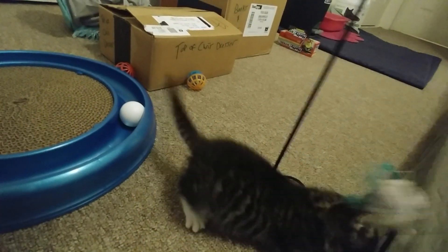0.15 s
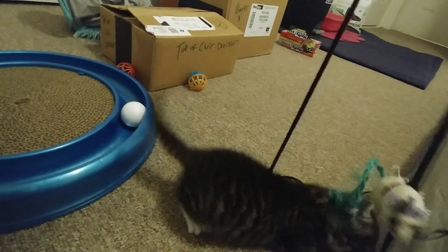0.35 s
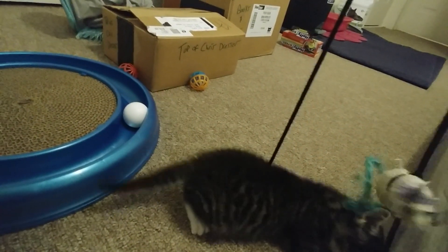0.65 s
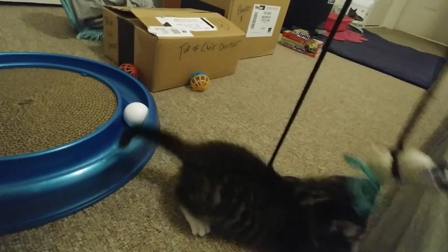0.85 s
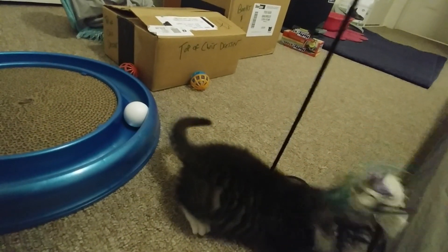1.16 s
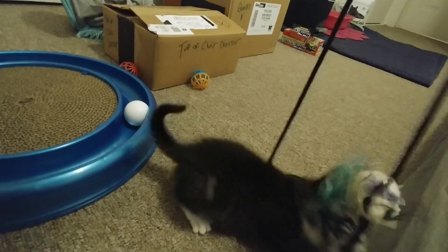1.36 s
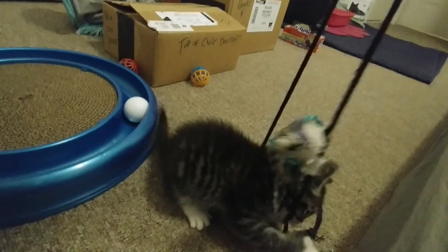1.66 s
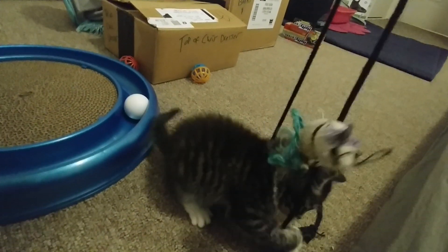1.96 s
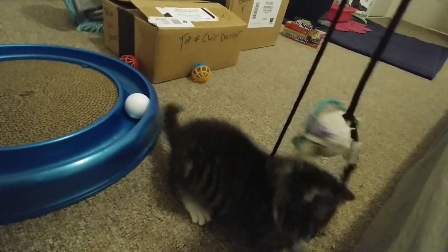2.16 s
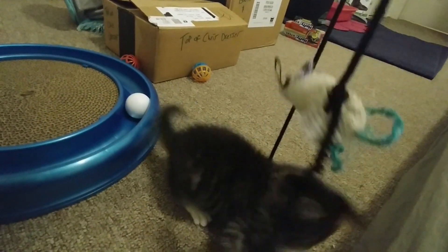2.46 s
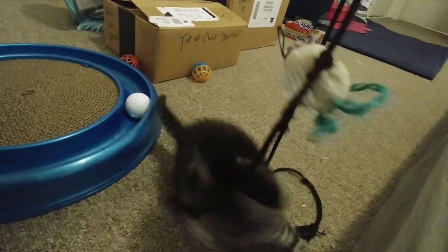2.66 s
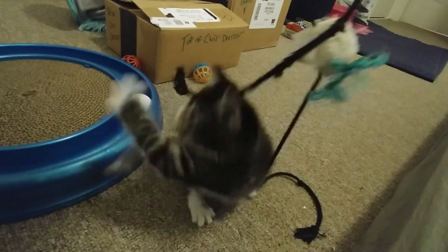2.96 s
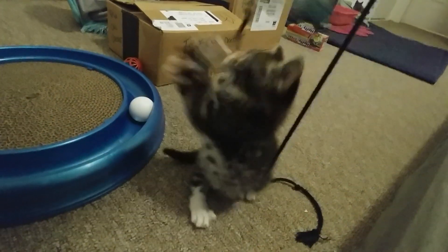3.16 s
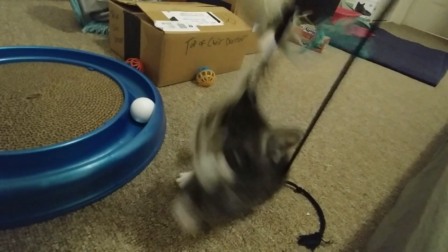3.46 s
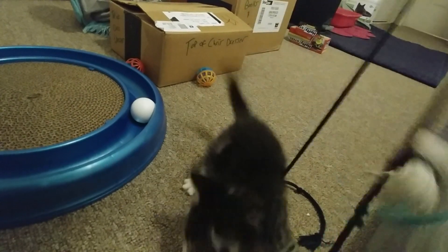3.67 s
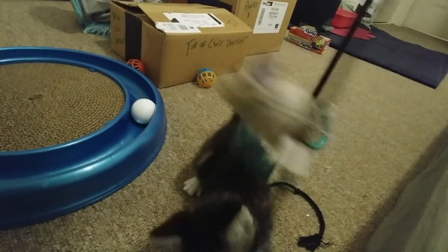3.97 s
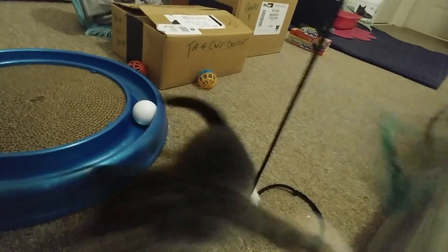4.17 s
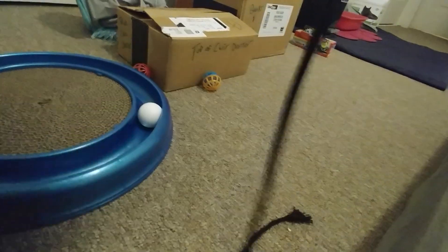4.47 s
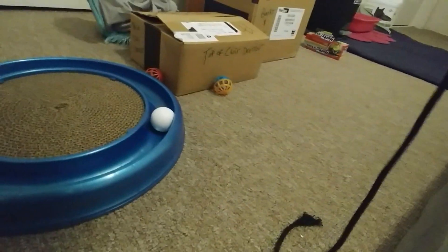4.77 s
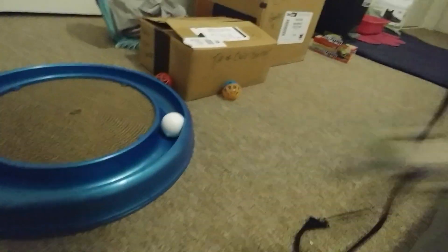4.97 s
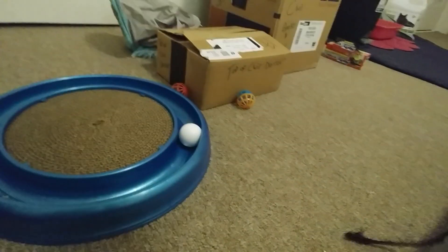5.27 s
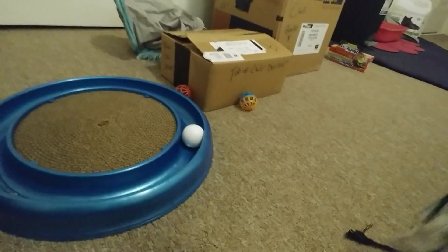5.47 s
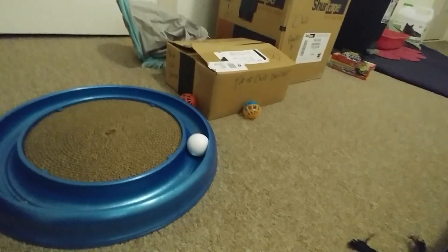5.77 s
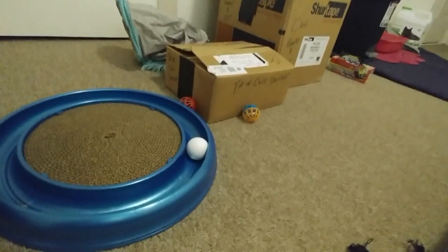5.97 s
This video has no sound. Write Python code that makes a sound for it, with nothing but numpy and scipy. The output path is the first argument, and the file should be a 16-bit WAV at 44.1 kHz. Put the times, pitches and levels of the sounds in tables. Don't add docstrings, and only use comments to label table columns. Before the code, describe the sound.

Quiet indoor hum and soft hiss continue throughout, with tiny, faint, distant chirps mostly in the first 1.3 seconds. Close by, at 0.1 s a soft paw thump starts a crackling drag of fur over carpet, fading by 0.4 s with a dull brush. A scrape at 0.8 s and a sharp tick with a low thump at 0.92 s follow; then light brushes and clicks around 1.4-1.5 s. After a lull, a swishing swipe and low thuds land at 2.15-2.25 s. Two bumps at 2.6-2.7 s end in a hard cord snap. Soft low pats and faint rubs pass from 3.1 to 3.9 s; a lone snap comes at 4.19 s. The strongest pounce hits at 4.5 s, dense cracks over woody floor thumps, with another knock at 4.6 s. A tick at 5.34 s precedes a bright cloth slap at 5.46 s and small scuffs until 5.7 s, leaving hiss.

```python
import sys
import numpy as np
from scipy import signal
from scipy.io import wavfile
from scipy.ndimage import uniform_filter1d

SR = 44100
rng = np.random.default_rng(int(sys.argv[2]) if len(sys.argv) > 2 else 0)


def level_to_linear(level):
    exponent = np.asarray(level, float) / 20
    return 10 ** exponent


def wav_record(signal):
    frames = np.transpose(np.atleast_2d(signal))
    bounded = np.clip(frames, -1, 1)
    quanta = np.round(bounded * 32767).astype(np.int16)
    wavfile.write(sys.argv[1], SR, quanta)


N = 269539

# (frequency [Hz], density [dB per Hz])
HISS_SPECTRUM = [(20, -42), (37, -16), (50, -7), (85, -1), (116, -8), (237, -12), (313, -13.5),
                 (607, -17.5), (1350, -22), (3100, -26), (6190, -29.5), (10800, -37.5), (13000, -32),
                 (15900, -31)]
# (frequency [Hz], left-right correlation [-1..1])
HISS_LIKENESS = [(60, 0.76), (240, 0.37), (950, -0.037), (3770, -0.026), (15000, -0.028)]
# (frequency [Hz], left over right [dB])
HISS_BALANCE = [(60, 5.5), (180, 2), (550, 0.5), (1650, 3), (4970, 0), (15000, 0.5)]
HISS_DB = -68
# (time [s], length [s], first pitch [Hz], last pitch [Hz], level [dB])
CHIRPS = [(0, 0.0073, 6770, 7470, -55), (0.012, 0.04, 3230, 3120, -68), (0.535, 0.054, 8400, 7920, -67),
          (0.525, 0.059, 5700, 5170, -79), (0.735, 0.05, 3470, 3330, -74), (0.565, 0.11, 5080, 4950, -79),
          (0.915, 0.035, 3100, 2980, -62), (0.93, 0.13, 5140, 4900, -76), (1.005, 0.075, 3470, 3060, -64),
          (1.097, .06, 6200, 5500, -81), (1.225, 0.03, 6310, 5640, -72.5), (1.229, 0.03, 2700, 2400, -79),
          (1.3, 0.055, 4000, 2860, -68), (1.313, 0.038, 3850, 3600, -73), (1.305, 0.085, 7170, 7140, -82),
          (1.836, .095, 5310, 5320, -81.5), (3.26, .036, 7220, 7260, -84), (3.28, 0.03, 6100, 6000, -87),
          (3.698, 0.092, 7200, 7200, -86), (3.776, 0.06, 6160, 6030, -83), (5.165, .12, 5700, 5360, -88),
          (.06, .04, 3100, 3030, -66), (.108, .04, 3080, 3020, -68), (0, .035, 7160, 7120, -67),
          (.785, .03, 3350, 3250, -67)]
BLUR_HZ, BLUR_HZ_PER_GLIDE_HZ = 70, 0.6
CHIRP_NOISE_SHARE = 0.55

# (time [s], dull peak [dB], bright over dull [dB], rise [s], fade t60 [s])
FUR_BRUSHES = [(.039, -62, 7, 0.023, 0.19), (0.389, -38.5, -6.5, 0.0097, 0.081),
               (0.47, -49, -10.5, 0.0028, 0.25), (0.92, -47, 3, 0.0072, 0.27),
               (1.396, -54.5, 5, 0.0078, 0.26), (1.502, -53.5, -2.5, 0.009, 0.27),
               (2.484, -48.5, 2, 0.0092, .12), (2.611, -48, -8.5, .004, 0.2),
               (3.15, -70, 14.5, 0.0074, 0.2), (3.493, -54.5, -7, 0.0045, 0.47),
               (3.588, -60, 0.5, 0.0066, 0.5), (3.666, -57, 0.5, 0.0045, 0.4),
               (3.879, -55.5, 0.5, 0.0035, 0.3), (4.311, -52, -2, 0.006, 0.22),
               (4.379, -49.5, -2.5, 0.0059, 0.21), (4.421, -66, 3, .012, 1),
               (5.334, -44, -10, 0.0064, 0.29), (5.672, -47.5, -5.5, 0.0093, 0.29)]
FINE_SLOPE, FINE_DB = 1.43, 1.5
# (peak time [s], level [dB], rise t60 [s], fade t60 [s])
FUR_SCRAPES = [(.13, -50.5, 0.025, 1), (.2, -47.5, 0.23, 0.43), (.345, -54.5, 0.53, 0.07),
               (.802, -50, 0.13, 0.16), (2.16, -54.5, 0.012, 0.24), (2.209, -42.5, 0.087, 0.043),
               (2.225, -72, .05, 0.11), (2.622, -69, 0.0089, 0.067), (2.69, -57, 0.015, 0.18),
               (2.76, -73, .1, 0.46), (4.14, -62, 0.084, 0.093), (4.2, -59.5, 0.12, 0.22),
               (4.505, -38, 0.04, 0.066), (4.62, -57, 0.15, 0.25), (4.7, -69.5, 0.26, 0.38),
               (5.52, -68, 0.071, 0.13), (5.59, -61.5, 0.11, 0.27)]
# (peak time [s], level [dB], rise t60 [s], fade t60 [s], brightest [Hz])
CLOTH_RUSTLES = [(0.127, -50, 0.018, 0.63, 3170), (.265, -54, 0.62, 0.34, 3000),
                 (.345, -58, 0.65, 0.11, 3230), (0.8, -56.5, 0.11, 0.31, 3020),
                 (2.192, -52.5, 0.038, 0.22, 3650), (2.205, -35.5, 0.064, 0.017, 4800),
                 (2.705, -89, 0.036, 0.11, 3940), (4.2, -58, 0.15, 0.21, 3330),
                 (4.512, -45, 0.052, 0.064, 4730), (4.529, -56, .1, 0.11, 4080),
                 (4.598, -46.5, 0.011, 0.12, 2400), (4.62, -53.5, 0.14, 0.14, 2750),
                 (4.73, -65.5, 0.33, 0.47, 6300), (5.46, -38.5, 0.0062, 0.16, 3180),
                 (5.48, -37.5, 0.053, 0.071, 2270), (5.572, -63, 0.073, 0.2, 2090),
                 (5.62, -66, 0.33, 0.091, 6000), (5.72, -79, .4, 0.29, 1800)]
RUSTLE_FINE_DB = -11
# (peak time [s], fine level [dB], rise t60 [s], fade t60 [s], fizz over fine [dB])
CLOTH_SLAPS = [
    (2.21, -65, 0.34, 0.057, -30),
    (2.702, -82, 0.2, 0.17, 11),
    (4.328, -81, .12, 0.35, 9),
    (4.51, -54, 0.027, 0.069, -12),
    (5.46, -42, 0.0059, 0.15, -10),
    (5.484, -45.5, 0.05, 0.057, 1),
]
HOLD_S = 0.002
# (frequency [Hz], gain [dB])
PILE_COLOUR = [(150, -2), (250, 3.5), (631, -5.5), (714, -1), (1410, -4.5), (1590, -2), (1770, -5.5),
               (2470, -15), (4710, -12.5), (5140, -11), (5610, -15), (8690, -28), (10700, -35),
               (13000, 5.5), (16300, 10)]

# (time [s], peak [dB], board pitch [Hz], ring t60 [s])
PAW_LANDINGS = [(.119, -44, 150, 0.033), (0.126, -47, 100, 0.3), (0.922, -47.5, 177, 0.042),
                (0.931, -42, 83, 0.062), (2.162, -47.5, 355, .07), (2.161, -40, 115, 0.3),
                (2.195, -34, 155, 0.076), (2.218, -31, 80, 0.14), (2.6181, -40, 325, 0.1),
                (2.62, -42.5, 600, 0.016), (2.621, -33, 143, 0.054), (2.7051, -40, 300, 0.08),
                (2.7065, -46, 550, 0.017), (2.7015, -34.5, 144, 0.13), (3.41, -40.5, 85, 0.17),
                (3.462, -44, 88, 0.031), (3.625, -48, 76.9, 0.45), (3.67, -42, 81, 0.17),
                (4.186, -53, 157, 0.16), (4.381, -51, 196, 0.13), (4.419, -42.5, 256, 0.073),
                (4.421, -53, 780, 0.022), (4.496, -37, 380, 0.09), (4.511, -32.5, 350, 0.034),
                (4.52, -28.5, 190, 0.06), (4.526, -30, 98.2, 0.083), (4.5991, -33, 100.3, 0.18),
                (4.597, -41.5, 298, 0.032), (4.72, -52.5, 138.4, 0.32), (5.484, -46, 150, 0.14),
                (5.492, -45.5, 97, 0.11), (5.591, -46.5, 210, 0.051), (5.597, -47, 94, 0.11),
                (5.668, -47, 150, 0.11), (5.712, -47, 89.5, 0.072), (.042, -54, 130, .15),
                (.143, -44, 150, .1), (.163, -45, 140, .1), (4.383, -50, 310, .08), (4.4, -53, 380, .06),
                (4.437, -47, 170, .1), (4.53, -36, 180, .12), (4.595, -45, 590, .04),
                (4.6075, -43, 200, .07), (4.625, -43, 215, .1), (4.665, -49, 165, .12),
                (4.71, -53, 225, .08), (4.5972, -34, 140, .03), (2.492, -52, 115, .08),
                (5.341, -52, 320, .06)]
PAW_RISE_S = 0.0013
# (time [s], dull peak [dB], bright peak [dB])
CLAW_CATCHES = [(.118, -47, -72), (.767, -34, -64), (0.798, -35, -51), (.939, -39, -69), (3.517, -44, -66),
                (4.385, -35.5, -56), (4.509, -17, -53), (4.52, -32, -65), (4.596, -24, -39),
                (4.627, -37, -52), (5.336, -31.5, -53), (5.565, -45, -76), (5.585, -32.5, -49)]
CLAW_HZ, CLAW_MS, CLAW_RING = 2430, 0.93, 1.9
# (time [s], dull peak [dB], bright peak [dB], bright ring [Hz])
CORD_TICKS = [(0.403, -37, -50.5, 4300), (0.923, -22.5, -47, 7500), (1.224, -72.5, -64, 4770),
              (1.398, -47, -58, 5450), (1.524, -67, -62, 4500), (3.879, -42.5, -59, 4550),
              (2.161, -52, -60, 4030), (2.484, -62, -54, 4560), (2.687, -39, -58, 4000),
              (2.79, -56, -74, 5200), (3.149, -50, -62, 5800), (3.164, -53, -61, 5730),
              (3.286, -47, -70, 6040), (4.466, -43, -68, 4000), (4.502, -27, -41, 4000),
              (4.5, -27, -47, 5940), (4.5086, -11, -32.5, 5500), (4.51, -15.5, -25, 5730),
              (4.512, -29, -36, 4230), (4.514, -35, -35, 4200), (5.68, -44, -69.5, 5000)]
CORD_MS, CORD_RING = 0.54, 2.05
# (time [s], dull peak [dB], bright peak [dB], bright ring [Hz])
CORD_SNAPS = [
    (2.1495, -40, -47, 4000),
    (2.26, -48, -52, 4350),
    (2.6895, -34, -45, 4300),
    (2.7001, -20, -29, 4300),
    (2.7077, -43, -41, 4800),
    (4.1902, -29, -38, 5300),
    (4.4773, -42, -52, 4500),
    (4.4796, -28, -43, 5000),
    (4.4965, -19, -44, 5600),
]
# (time [s], dull peak [dB], bright peak [dB], bright ring [Hz])
FIBRE_SNAPS = [
    (.133, -30, -46, 3200),
    (.1445, -31, -50, 3600),
    (.1655, -30, -48, 3300),
    (.188, -29, -48, 3500),
    (.198, -29, -47, 3200),
    (.2105, -32, -50, 3400),
    (.2615, -36, -47, 3300),
    (.314, -38, -54, 4000),
    (.328, -40, -54, 3800),
    (.357, -42, -54, 4300),
]
SNAP_MS, SNAP_RING = .06, .5
# (peak time [s], rumble [dB], rise t60 [s], fade t60 [s])
WEIGHT_SHIFTS = [(.128, -47.5, 0.091, 1.13), (.766, -55, 0.091, 0.69), (2.135, -58, 0.017, 0.66),
                 (2.25, -45.5, 0.0056, 0.14), (2.47, -62.5, 0.011, 0.53), (2.655, -49, 0.024, 0.03),
                 (2.688, -46, 0.031, 0.027), (2.75, -57, .012, 0.34), (2.95, -73, 1.1, 0.073),
                 (3.5, -69, 0.027, 0.92), (3.72, -60, 0.0085, .06), (3.74, -65.5, .05, 2.5),
                 (4.48, -54, 1.1, 0.026), (4.64, -44, 0.0074, 0.1), (4.67, -56.5, 0.051, 0.73),
                 (5.345, -58, 0.03, 0.32), (5.62, -58, 0.017, 1.)]
# (frequency [Hz], width [Hz], gain [dB])
FLOOR_MODES = [(87.5, 54, 8.5), (150, 53, 3.5), (230, 118, -9), (320, 22, -27)]
# (time [s], length [s], first centre [Hz], last centre [Hz], level [dB])
STROKES = [(0.13, 0.03, 2250, 1900, -43.5), (0.148, .09, 1490, 1000, -51.5), (0.189, .045, 925, 816, -54),
           (.26, 0.0088, 3300, 3300, -50.5), (0.299, 0.049, 3800, 3620, -67),
           (.392, 0.023, 1480, 1400, -59.5), (0.788, 0.029, 1425, 1320, -51), (2.18, 0.028, 780, 760, -53),
           (4.495, 0.024, 870, 800, -46), (4.516, 0.0156, 756, 900, -48), (2.191, 0.029, 7960, 8200, -66),
           (4.509, .007, 1560, 1540, -38), (4.511, 0.0049, 8800, 8850, -48.5),
           (4.175, .06, 8000, 7900, -71), (5.58, 0.043, 6200, 5600, -66), (2.182, 0.018, 2860, 3760, -44.5),
           (2.189, 0.025, 3570, 5100, -39.5), (2.198, .018, 3500, 2700, -41.5),
           (2.157, 0.0093, 1310, 1600, -68), (4.196, 0.011, 1300, 1300, -57.5),
           (4.594, 0.009, 2350, 2400, -41), (4.594, 0.0062, 4800, 4830, -48),
           (4.611, 0.012, 2670, 2780, -51), (5.458, 0.0233, 3240, 3380, -48),
           (5.459, 0.045, 1920, 2140, -48.5), (5.465, 0.034, 6800, 6400, -42),
           (5.567, 0.011, 2100, 2000, -65), (5.577, 0.031, 1780, 1670, -62.5),
           (5.693, 0.066, 1750, 1680, -74.5), (.152, .035, 2000, 1700, -48), (.136, .04, 1050, 950, -50),
           (.186, .04, 1600, 1450, -51), (2.161, .006, 4000, 3800, -58), (4.497, .012, 1500, 1400, -41),
           (4.514, .02, 1500, 1300, -48), (2.793, .02, 4300, 4000, -83), (2.708, .014, 3800, 3700, -64)]
STROKE_WIDTH = 0.27
# (time [s], peak [dB], ring [Hz], decay [ms])
PINGS = [(.4035, -50, 4800, 1.), (.9248, -41, 7330, 0.4), (.9425, -47, 7200, 0.91),
         (1.525, -41, 7560, 0.85), (3.029, -55.5, 4550, .7), (3.045, -64.5, 4780, .7),
         (3.666, -48, 1460, 0.77), (3.879, -40, 4400, 0.42), (4.321, -59, 4460, 0.55),
         (4.326, -57, 4010, 0.39), (4.3858, -45, 1860, 1.1), (4.386, -54.5, 4070, .7),
         (5.337, -64, 2620, 0.62), (5.582, -48, 1900, 1.), (5.587, -58, 5500, .6)]

# (time [s], left over right [dB], left port lead [ms])
PLACE = [(0, 7.5, -0.26), (.8, 9, -0.37), (.92, 3, -0.27), (1.2, 3, -.02), (1.5, 7.5, -0.13),
         (2.2, 9, -0.13), (2.7, 7, -0.22), (3.9, 8, -0.18), (4.25, 5.5, -0.15), (4.36, 11.5, 0.17),
         (4.6, 3.5, 0.418), (5.42, 5, 0.36), (5.449, -2, -0.61), (5.539, 5, -0.46), (5.558, 5, 0.52)]
# (frequency [Hz], share of the level lean [ratio])
BODY_SHADOW = [(100, 0.59), (400, 0.41), (700, 0.75), (1300, 1.64), (2400, 0.74), (4400, 2.19),
               (8000, 0.067), (15000, 0.49)]
# (frequency [Hz], t60 [s])
ROOM_T60 = [(100, 0.18), (500, 0.16), (2000, 0.14), (6000, 0.14), (14000, 0.12)]
EDGE_HZ = 15800


def evened(x):
    return x / np.sqrt(np.mean(x ** 2) + 1e-20)


def read(points, hz):
    f, value = np.transpose(points)
    return np.interp(np.log(hz + 1), np.log(f + 1), value)


def add(mix, s, sound):
    part = mix[..., round(s * SR):][..., :sound.shape[-1]]
    part += sound[..., :part.shape[-1]]


def resonate(x, hz, width_hz):
    turn = np.exp(2j * np.pi * np.cumsum(hz * np.ones(len(x))) / SR)
    r = np.exp(-np.pi * width_hz / SR)
    smooth = signal.lfilter([1 - r], [1, -r], x / turn + 1e-18)
    return 2 * (turn * smooth).real


def resonate_twice(x, hz, width_hz):
    return resonate(resonate(x, hz, width_hz), hz, width_hz)


def swells(rows):
    s, db, rise_s, fade_s = np.transpose(rows)[:, :, None]
    t = np.arange(0, N + 32, 32) / SR
    before = (s - t) / abs(rise_s)
    after = np.maximum(t - s - HOLD_S, 0) / abs(fade_s)
    fall_db = np.minimum(60 * np.maximum(before, after), 200)
    gain = np.sqrt((level_to_linear(db - fall_db) ** 2).sum(0))
    return np.interp(np.arange(N) / SR, t, gain)


def pile_taps(low_hz, high_hz):
    hz = abs(np.fft.fftfreq(2048, 1 / SR)) + 1
    edges = np.sqrt((1 + (low_hz / hz) ** 6) * (1 + (hz / high_hz) ** 24))
    log_gain = np.log(level_to_linear(read(PILE_COLOUR, hz)) / edges + 1e-5)
    minimum_phase = np.exp(log_gain - 1j * signal.hilbert(log_gain).imag)
    taps = np.fft.ifft(minimum_phase).real[:1024]
    return taps / np.linalg.norm(taps)


def hiss():
    frames, hz = N // 512 + 5, np.fft.rfftfreq(2048, 1 / SR)
    a, b, c, d, patches = rng.standard_normal((frames, 1025, 5)).T
    patches = uniform_filter1d(patches, size=30, axis=0)
    patches = evened(uniform_filter1d(patches, size=8, axis=1))
    same = np.clip(read(HISS_LIKENESS, hz), -1, 1)[:, None]
    left = a + 1j * b
    right = same * left + np.sqrt(1 - same ** 2) * (c + 1j * d)
    half_db = read(HISS_BALANCE, hz)[:, None] / 2
    patch_db = 1.94 * patches * (hz[:, None] < 7000)
    level_db = read(HISS_SPECTRUM, hz)[:, None] + patch_db + np.array([half_db, -half_db])
    z = np.array([left, right]) * level_to_linear(level_db)
    noise = signal.istft(z, nperseg=2048, noverlap=1536)[1][:, :N]
    return level_to_linear(HISS_DB + 2.5) * evened(noise)


def chirps():
    out = np.zeros(N)
    breaths = rng.standard_normal((len(CHIRPS), 9000))
    for (s, length_s, first_hz, last_hz, db), air in zip(CHIRPS, breaths):
        count = round(length_s * SR)
        glide_hz = np.linspace(first_hz, last_hz, count)
        width_hz = BLUR_HZ + BLUR_HZ_PER_GLIDE_HZ * abs(first_hz - last_hz)
        blur = evened(resonate_twice(air[:count], glide_hz, width_hz))
        tone = np.sin(2 * np.pi * np.cumsum(glide_hz) / SR)
        whistle = CHIRP_NOISE_SHARE * blur + (1 - CHIRP_NOISE_SHARE) * tone
        add(out, s, level_to_linear(db) * evened(whistle) * signal.windows.tukey(count, .4))
    return out


def brushes():
    out, t = np.zeros((3, N)), np.arange(SR // 4) / SR
    for s, dull_db, over_db, rise_s, t60_s in FUR_BRUSHES:
        bright_db = dull_db + over_db
        fine_db = dull_db + FINE_SLOPE * over_db + FINE_DB
        shape = (1 - np.exp(-t / max(rise_s, .001))) * level_to_linear(-60 * t / t60_s)
        gains = level_to_linear(np.array([dull_db - 17.5, bright_db - 16.0, fine_db - 20.5]))
        add(out, s, np.outer(gains, shape / shape.max()))
    return out


def scuffles(bands):
    scrape = swells(FUR_SCRAPES)
    rustle = swells([row[:-1] for row in CLOTH_RUSTLES])
    brightest_hz = np.interp(np.arange(N) / SR, *np.transpose(CLOTH_RUSTLES)[[0, -1]])
    slap = swells([row[:-1] for row in CLOTH_SLAPS])
    crinkle = swells([(s, db + over_db, rise, fade) for s, db, rise, fade, over_db in CLOTH_SLAPS])
    brush_dull, brush_bright, brush_fine = brushes()
    noise = rng.standard_normal((2, N))
    snaps_db = 2.8 * evened(uniform_filter1d(rng.standard_normal((4, N)), size=60))
    out = []
    for stream in (noise[0], 0.53 * noise[0] + 0.9 * noise[1]):
        dull, bright, fine, fizz = (evened(signal.oaconvolve(stream * level_to_linear(db), taps)[:N])
                                    for db, taps in zip(snaps_db, bands))
        ringing = evened(bright + 2.14 * resonate(bright + 0.95 * dull, brightest_hz, 920))
        fur = (scrape + brush_dull) * dull + brush_bright * bright + brush_fine * fine
        cloth = rustle * ringing + crinkle * fizz + (level_to_linear(RUSTLE_FINE_DB) * rustle + slap) * fine
        out.append(fur + cloth)
    return np.array(out)


def paws():
    out, t = np.zeros(N), np.arange(SR // 3) / SR
    for s, db, hz, t60_s in PAW_LANDINGS:
        damping_db = -25 * t / t60_s - 190 * (t / t60_s) ** 2
        shape = (1 - np.exp(-t / PAW_RISE_S)) * level_to_linear(damping_db)
        add(out, s, level_to_linear(db) * shape / shape.max() * np.sin(2 * np.pi * hz * t))
    return out


def ticks(bands):
    out, t = np.zeros(N), np.arange(900) / SR
    rows = [row + (CLAW_HZ, CLAW_MS, CLAW_RING) for row in CLAW_CATCHES]
    rows += [row + (CORD_MS, CORD_RING) for row in CORD_TICKS]
    rows += [row + (SNAP_MS, SNAP_RING) for row in CORD_SNAPS + FIBRE_SNAPS]
    grits = rng.standard_normal((len(rows), 900))
    for (s, dull_db, bright_db, hz, splinter_ms, ring), grit in zip(rows, grits):
        crack = 0.23 * grit * np.exp(-t * 1000 / max(splinter_ms, .05))
        crack[0] = -1
        dull, bright, fine, fizz = (np.convolve(crack, taps)[:900] for taps in bands)
        broad = bright + 0.6 * fine + 0.1 * fizz
        bright = broad + ring * resonate_twice(bright + 1.25 * fine, hz, 1500)
        knock = level_to_linear(dull_db - 9.5) * dull / abs(dull).max()
        add(out, s + 0.001226, knock + level_to_linear(bright_db + 6.0) * bright / abs(bright).max())
    return out


def boards(x):
    return sum(level_to_linear(db) * resonate(resonate(x, hz, width_hz), hz, 2 * width_hz)
               for hz, width_hz, db in FLOOR_MODES)


def rumble():
    return swells(WEIGHT_SHIFTS) * level_to_linear(-0.5) * evened(boards(rng.standard_normal(N)))


def strokes():
    out = np.zeros(N)
    grits = rng.standard_normal((len(STROKES), 6000))
    for (s, length_s, first_hz, last_hz, db), grit in zip(STROKES, grits):
        count = round(length_s * SR)
        glide_hz = np.linspace(first_hz, last_hz, count)
        width_hz = STROKE_WIDTH * np.sqrt(first_hz * last_hz)
        uneven_db = 2.8 * evened(uniform_filter1d(grit[::-1], size=90))
        friction = grit[:count] * level_to_linear(uneven_db)[:count]
        band = resonate_twice(friction, glide_hz, width_hz)
        add(out, s, level_to_linear(db) * evened(band) * signal.windows.tukey(count, .45))
    return out


def pings():
    out, t = np.zeros(N), np.arange(900) / SR
    for s, db, hz, decay_ms in PINGS:
        u = 2 * t * 1000 / max(decay_ms, .1)
        add(out, s, level_to_linear(db) * u * np.exp(1 - u) * np.sin(2 * np.pi * hz * t))
    return out


def ports(pair):
    hz, t, z = signal.stft(pair, SR, nperseg=256)
    s, lean_db, lead_ms = np.transpose(PLACE)
    half_db = np.outer(read(BODY_SHADOW, hz), np.interp(t, s, lean_db)) / 2
    lead_s = np.interp(t, s, lead_ms) / 1000
    left_first = np.outer(hz, np.maximum(lead_s, 0))
    right_first = np.outer(hz ** 3 / (hz ** 2 + 600 ** 2), np.minimum(lead_s, 0))
    late = np.exp(-2j * np.pi * (left_first + right_first))
    gains = np.array([level_to_linear(half_db + 1.5), level_to_linear(-half_db + 0.5) * late])
    return signal.istft(z * gains, SR, nperseg=256)[1][:, :N]


def room(x, faster):
    taps = np.zeros((2, SR // 2))
    slots = np.arange(160, SR // 2 - 20, 20)
    at = slots + rng.integers(0, 20, (2, len(slots)))
    np.put_along_axis(taps, at, rng.choice([-1., 1.], at.shape), 1)
    hz, t, z = signal.stft(taps, SR, nperseg=256)
    decay = level_to_linear(-60 * faster * t / read(ROOM_T60, hz)[:, None])
    tail = signal.istft(z * decay, SR, nperseg=256)[1]
    return signal.fftconvolve(x[None], tail / np.linalg.norm(tail[0]), axes=1)[:, :N]


def scene():
    edges_hz = (350, 2500), (2500, 6500), (6500, 9000), (11500, 16000)
    bands = [pile_taps(*edge) for edge in edges_hz]
    far = chirps()
    near = scuffles(bands) + paws() + ticks(bands) + rumble() + strokes() + pings()
    near_heard = ports(near) + level_to_linear(-10) * room(near[0], 0.95)
    far_heard = level_to_linear(-4) * far + level_to_linear(2.5) * room(far, 0.6)
    return hiss() + far_heard + near_heard


def low_pass(x):
    return signal.sosfilt(signal.butter(12, 16500, fs=SR, output="sos"), x)


def record(dry):
    cut = signal.sosfilt(signal.butter(6, 45, "high", fs=SR, output="sos"), dry)
    rounded = .3 * np.tanh(cut / .3)
    edge = signal.firwin(511, EDGE_HZ, window=("kaiser", 4), fs=SR)
    limited = signal.oaconvolve(rounded, edge[None], "same", axes=1)
    return low_pass(limited)


dry = scene()
out = record(dry)
wav_record(out)
```